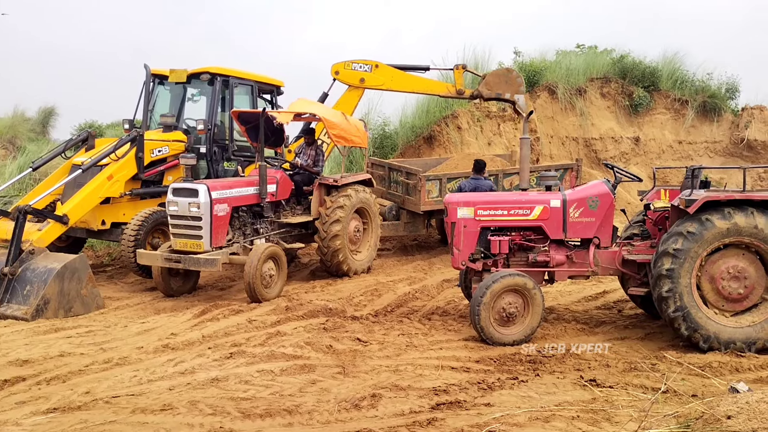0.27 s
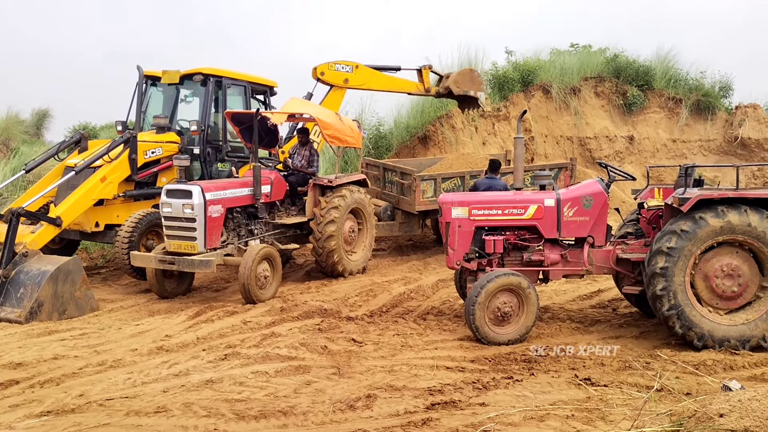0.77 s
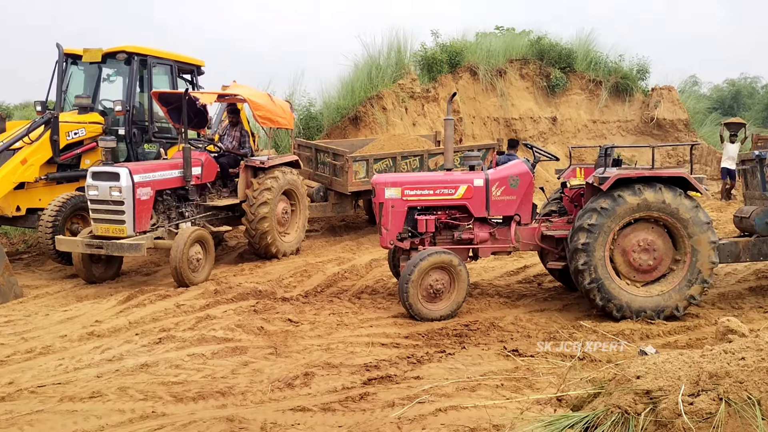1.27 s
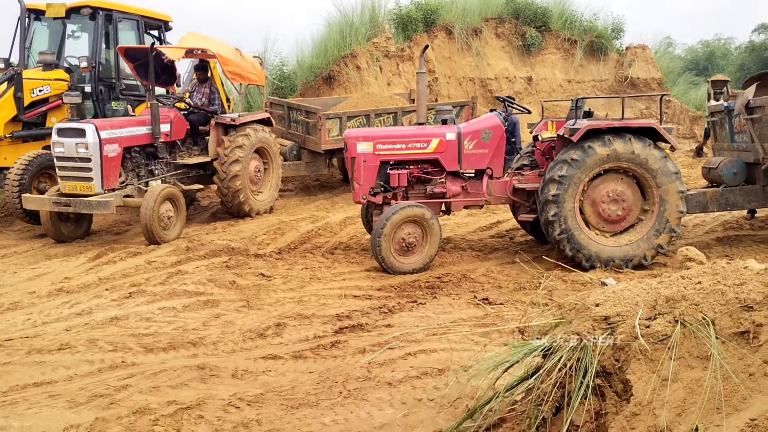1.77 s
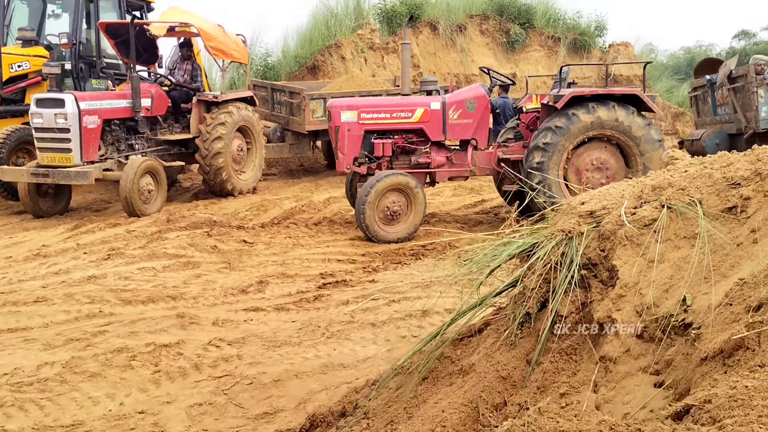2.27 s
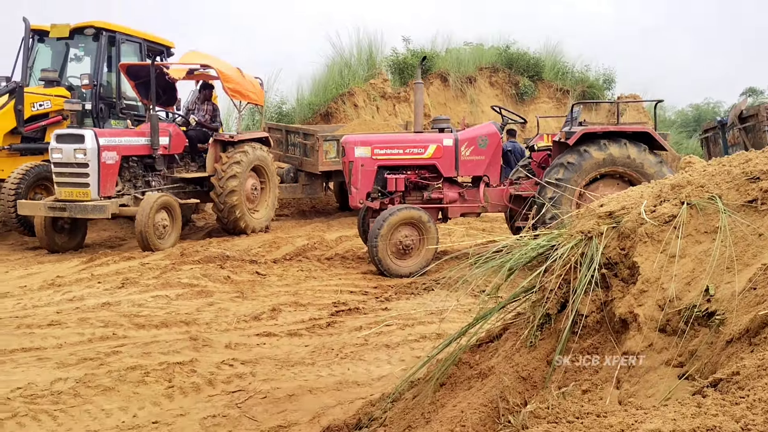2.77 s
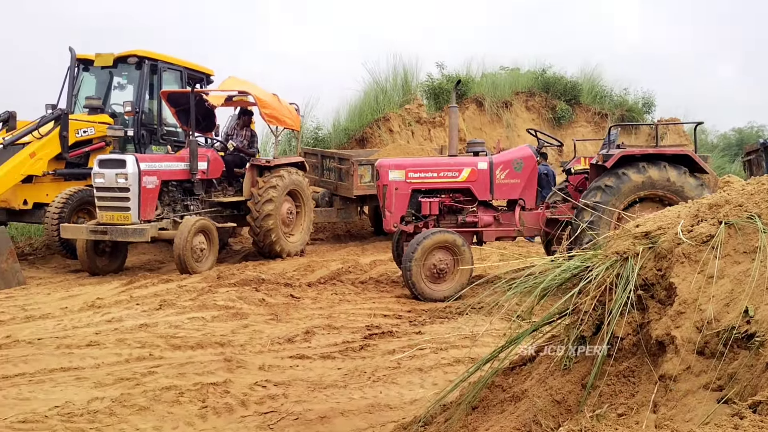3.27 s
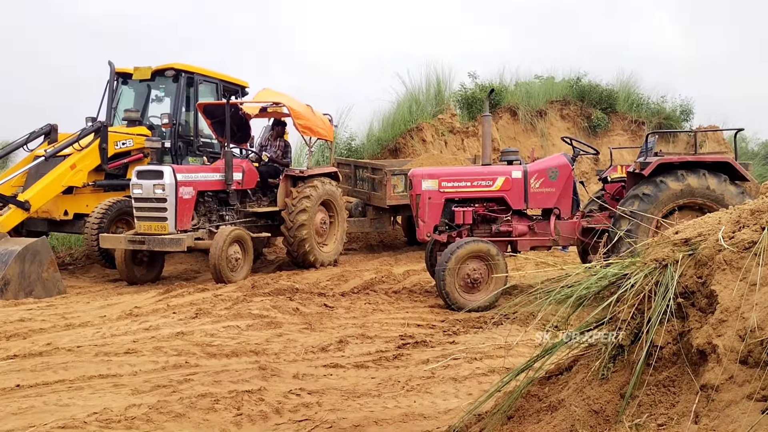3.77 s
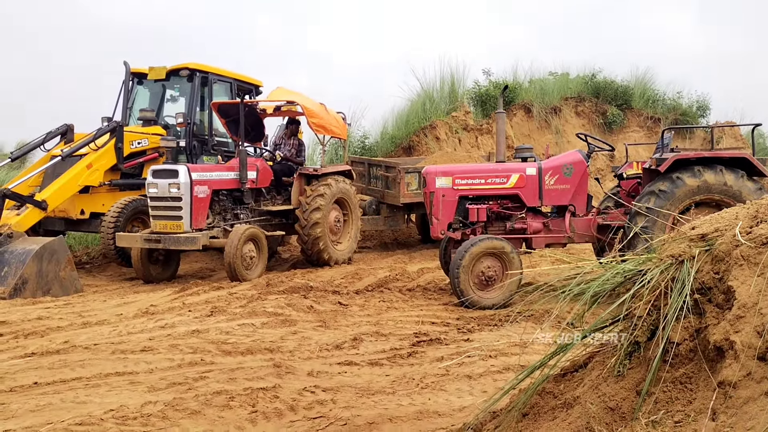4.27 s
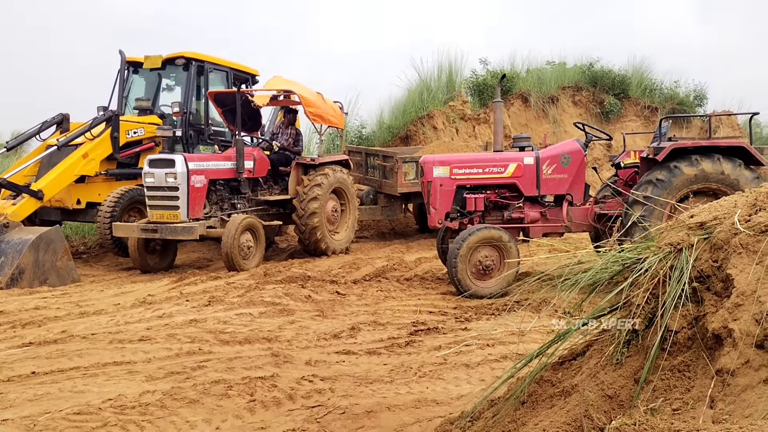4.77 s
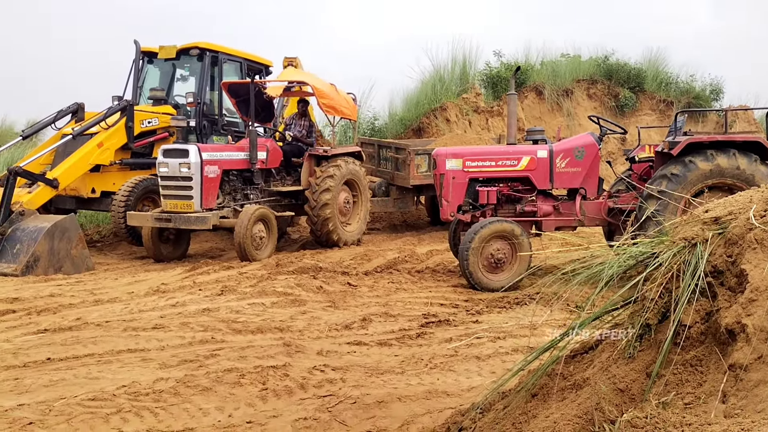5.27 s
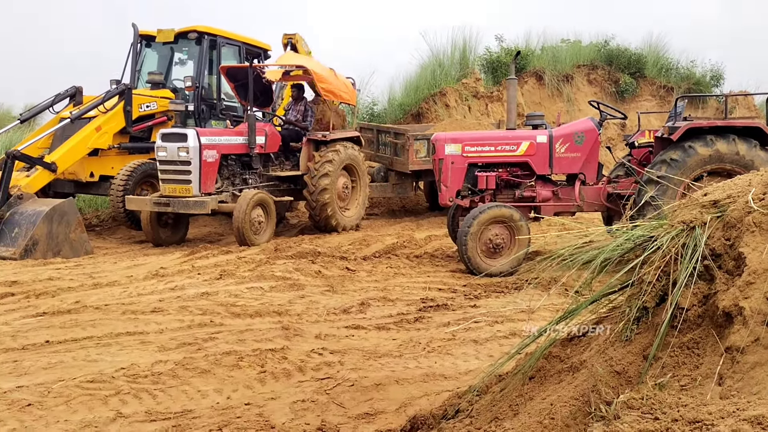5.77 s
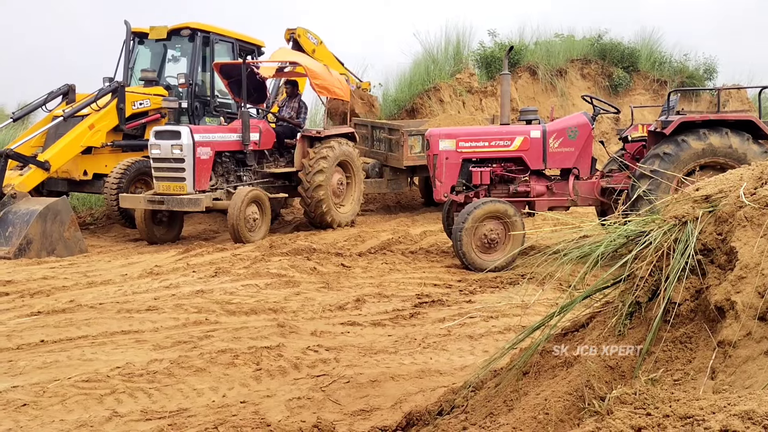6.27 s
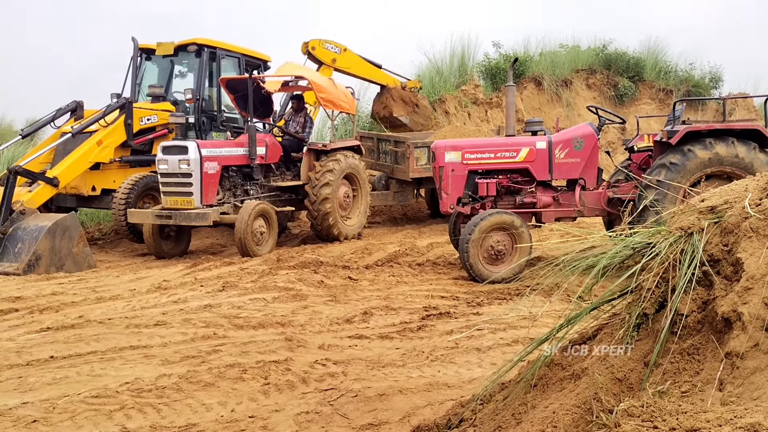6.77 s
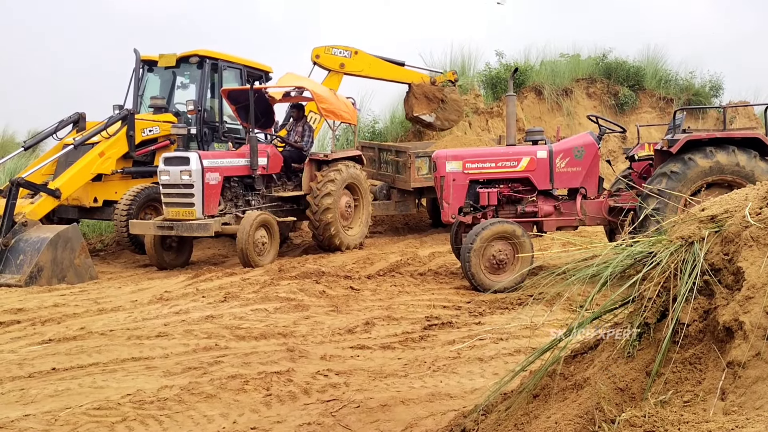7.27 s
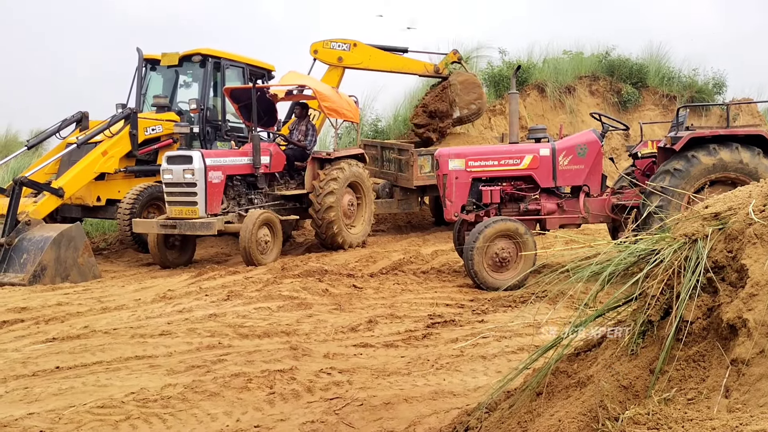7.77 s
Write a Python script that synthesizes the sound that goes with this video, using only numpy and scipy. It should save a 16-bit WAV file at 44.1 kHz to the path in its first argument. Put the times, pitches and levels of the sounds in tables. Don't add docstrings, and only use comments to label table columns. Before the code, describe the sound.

Outdoors at a soil pit, a backhoe loader's diesel drones steadily with clattering block, ticking valves and hydraulic roar at first. A tractor knocks fast beside it with tinny rattle. Steel bucket hits come early, then bass swells and highs dull as the microphone moves behind a mound. Past the middle the tractor slows to a faint idle, while loose panels keep clanking. Stereo handheld microphone, wind puffs.

```python
import sys
import numpy as np
from scipy import signal
from scipy.fft import rfft, irfft, next_fast_len
from scipy.io import wavfile
from scipy.ndimage import uniform_filter1d

SR = 44100
rng = np.random.default_rng(int(sys.argv[2]) if len(sys.argv) > 2 else 0)


def materialize(psi):
    bounded = np.clip(np.atleast_2d(psi).T, -1, 1)
    quanta = np.round(bounded * 32767).astype(np.int16)
    wavfile.write(sys.argv[1], SR, quanta)


def invert_db(x):
    u = np.asarray(x, float) / 20
    return 10 ** u


N = 353946

# start_s, level_db
MOUND_SWELL = [(0, -46), (.2, -50), (.53, -41), (.75, -49), (.95, -45.5), (1.3, -51.5), (1.75, -46.5),
               (2.1, -39.5), (2.35, -38), (2.7, -34), (3.3, -32.5), (4.35, -32), (4.65, -30), (5.35, -30.5),
               (5.8, -32), (6.4, -30.5), (7.3, -31.5), (8.03, -37)]
# start_s, knock_db, tin_looseness_db
TRACTOR_LEVELS = [(0, -45.5, -9.5), (.96, -43.5, -11.5), (1.3, -42, -10), (1.74, -42, -9),
                  (2.3, -41.5, -15), (2.5, -43.5, -14), (3.37, -41.5, -9.5), (4.45, -44.5, -10.5),
                  (4.65, -48.5, -12), (4.87, -66, 0), (5.8, -63, 1), (6.6, -67, 4), (6.75, -60, -0.5),
                  (7.0, -58, -3), (7.12, -61, -1), (7.28, -51.5, -12), (7.55, -60, 0), (8.03, -56, -4.5)]


def rms_one(x):
    return x / np.sqrt(np.mean(x ** 2) + 1e-20)


def in_time(rows):
    s, *columns = np.transpose(rows)
    return [np.interp(np.arange(N) / SR, s, column) for column in columns]


def at_hz(points, hz):
    hz_points, values = np.transpose(points)
    return np.interp(np.log(np.maximum(hz, 1)), np.log(hz_points), values)


def coarse_drift(rate):
    r = np.exp(-80 * np.pi * rate / SR)
    noise = rng.standard_normal(N // 40 + 2002)
    return rms_one(signal.lfilter([1], [1, -2 * r, r * r], noise)[2000:])


def fine(coarse, size=N):
    return np.interp(np.arange(size) / 40, np.arange(len(coarse)), coarse)


def drift(rate):
    return fine(coarse_drift(rate))


def colour(x, points):
    size = next_fast_len(N)
    gain = invert_db(at_hz(points, np.fft.rfftfreq(size, 1 / SR)))
    return irfft(rfft(x, size) * gain, size)[:, :N]


def body(x, peaks, patchy_db=0):
    out = 0
    for k, (hz, width, db) in enumerate(peaks):
        r = np.exp(-np.pi * 1.5 * width / SR)
        b = (1 - r * r) / 2 * np.array([1, 0, -1])
        a = [1, -2 * r * np.cos(2 * np.pi * hz / SR), r * r]
        swell = invert_db(db)
        if patchy_db:
            wander = 1.8 * coarse_drift(15.7) + 1.1 * coarse_drift(2.56)
            swell = fine(invert_db(db + patchy_db * wander), x.shape[1])
        out = out + (-1) ** k * swell * signal.sosfilt([[*b, *a]] * 2, x)
    return rms_one(out)


def body_during(start_s, end_s, x, peaks, patchy_db):
    out = np.zeros_like(x)
    span = slice(round(start_s * SR), round(end_s * SR))
    out[:, span] = body(x[:, span], peaks, patchy_db)
    return out


def firings(count, cylinders_db, spread_db, decay_s, between_db, alike=0, uneven=(), contact=0):
    which = np.floor(count).astype(int)
    total = which[-1] + 2
    size = invert_db(np.resize(cylinders_db, total) + spread_db * rng.standard_normal(600)[:total])
    for s, db in uneven:
        size[round(count[round(s * SR)])] *= invert_db(db)
    fired = np.diff(which, prepend=which[0]) > 0
    burst = signal.lfilter([1], [1, -np.exp(-1 / (decay_s * SR))], fired * size[which])
    noise = rng.standard_normal((2, N))
    since = np.arange(N) - np.maximum.accumulate(fired * np.arange(N))
    grain = np.sqrt(alike) * noise[:, since] + np.sqrt(1 - alike) * noise
    first_blow = contact * fired * burst * [[1], [.5]]
    return burst * grain + invert_db(between_db) * noise[:, ::-1] + first_blow


def exhaust(count, orders, wobble_db):
    out = 0
    for multiple, db, sign in orders:
        level = invert_db(db + wobble_db * (1 - db / 8) * drift(5))
        out = out + sign * level * np.sqrt(2) * np.cos(2 * np.pi * multiple * count)
    return out


def loader():
    # start_s, speed_rpm
    speed = [(0.0, 1460.3), (0.34, 1356.6), (0.6, 1497.8), (0.9, 1419.6), (1.2, 1528.3), (1.45, 1469.0),
             (2.5, 1440.1), (3.8, 1421.8), (4.1, 1430.8), (4.36, 1383.3), (4.68, 1434.4), (5.1, 1412.6),
             (5.68, 1445.7), (6.0, 1392.4), (6.7, 1449.6), (7.1, 1416.8), (7.72, 1484.2), (8.03, 1436.6)]
    # start_s, effort_db over the mean, bonnet_turned_db towards the ports
    digging = [(0, 9, -46), (.3, 3.5, -1), (.5, 7.5, -1), (.83, 3.5, -5.5), (1.09, 6.5, 1.5),
               (1.5, -0.5, -6), (2.4, 0.5, -6), (3.1, 1.5, -4.5), (4.1, 2.5, -3.5), (4.47, -1, 7),
               (4.8, -6.5, 4), (5.0, -2, 2.5), (5.4, -8, 8.5), (6.04, -5, 5), (6.5, -4.5, 5.5),
               (7.0, -2.5, 4), (7.4, -2.5, 3.5), (8.03, -2.5, 2.5)]
    # multiple of the four-stroke cycle, level_db, polarity
    pipe_orders = [(4, -31, 1), (6, -34, -1), (7, -27, -1), (8, 0, 1), (10, -15, 1), (11, -28, 1),
                   (12, -13, 1), (13, -30, -1), (14, -29, -1), (16, -24, -1), (18, -31, 1), (23, -35, 1)]
    # pitch_hz, width_hz, level_db
    pipe_puff = [(78.6, 128, -3.5), (108.6, 49, -2), (123.3, 29, 2), (151, 141, -6)]
    # pitch_hz, width_hz, level_db
    block_peaks = [(778, 69, -12), (800, 52, -7.5)]
    bonnet_peaks = [(585.5, 69, 3), (966, 110, 3.5), (1136, 33, 2.5), (1297, 63, 6), (1600, 107, 5),
                    (1793, 32, -1)]
    valve_peaks = [(3854, 270, 2.5), (4514, 640, -6), (5164, 730, 0.5), (5910, 82, 5), (7770, 260, -9.5),
                   (6400, 210, 9.5)]
    cylinder_levels = [0, -2, -4, -7]
    # start_s, level_db
    pump_levels = [(0, -45.5), (.3, -42.5), (.6, -42.5), (.9, -46.5), (1.15, -43.5), (1.3, -52),
                   (1.9, -54.5), (2.3, -70), (8.03, -113)]
    # pitch_hz, width_hz, level_db
    pump_peaks = [(394, 60, -9), (736, 100, -12.5), (928, 118, -4), (1120, 51, -11)]

    rpm, = in_time(speed)
    drone_db, = in_time(MOUND_SWELL)
    effort_db, turned_db = in_time(digging)
    cycles = .12 + np.cumsum(rpm) / 120 / SR
    tones = exhaust(cycles, pipe_orders, wobble_db=.6) * [[1], [0]]
    puff = invert_db(-19) * body(rng.standard_normal((2, N)), pipe_puff)
    drone = invert_db(drone_db + .2) * (tones + puff)
    strokes = firings(4 * cycles + .5, cylinder_levels, 1.8, .012, -9)
    block = invert_db(-55 + effort_db) * body(strokes, block_peaks, patchy_db=1.4)
    bonnet = invert_db(-51.5 + .98 * effort_db + turned_db) * body(strokes, bonnet_peaks, patchy_db=.35)
    taps = firings(4 * cycles + .6, [0], 1.5, .008, -9)
    ticks = invert_db(-58 + .71 * effort_db) * body(taps, valve_peaks, patchy_db=1.2)
    surges = firings(4 * cycles, [0], 3.0, .014, -11)
    pump = invert_db(in_time(pump_levels)[0]) * body_during(0, 2.6, surges, pump_peaks, 1.0)
    return drone + block + bonnet + ticks + pump


def tractor():
    # start_s, speed_rpm
    speed = [(0.0, 1033.4), (1.0, 1053.5), (2.0, 1046.1), (3.0, 1059.3), (3.5, 1060.6), (4.0, 1076.3),
             (4.4, 1023.1), (4.8, 945.7), (5.2, 697.9), (5.6, 631.9), (6.0, 733.8), (6.5, 730.0),
             (7.0, 715.5), (7.5, 668.2), (8.03, 721.4)]
    # multiple of the firing rate, level_db, polarity
    pipe_orders = [(2, -20, 1), (3, -8, 1), (4, 0, 1), (5, -11, -1), (6, -19, -1)]
    # pitch_hz, width_hz, level_db
    revved_peaks = [(2150, 314, 0.5), (2394, 70, 7), (2592, 252, 0), (2901, 110, -5), (4930, 510, -16.5)]
    idle_peaks = [(2210, 120, -23), (2600, 54, 4.5), (2843, 76, -5), (2920, 120, -12), (4750, 690, -24)]
    tin_peaks = [(7300, 2670, 9.5), (10030, 900, 1.5), (8250, 400, 2), (11130, 1140, 5)]
    cylinder_levels = [-3, -3.5, -4]
    # start_s, level_db
    revved_uneven = [(0.061, -2.6), (0.1, 4.9), (0.293, -2.1), (0.331, -2.3), (0.369, 2.1), (0.6, -8.4),
                     (0.638, 2.2), (0.676, 3.6), (0.714, 3.0), (0.905, -3.3), (0.943, 5.7), (0.981, -2.5),
                     (1.019, -4.2), (1.171, 5.6), (1.285, 4.8), (1.399, -4.0), (1.513, -2.2), (1.551, 2.9),
                     (1.666, 2.5), (1.704, -2.9), (1.895, 4.5), (1.971, -4.6), (2.009, 4.2), (2.429, -3.4),
                     (2.581, 3.5), (2.657, -4.7), (2.77, -4.3), (2.808, 3.0), (2.997, 3.8), (3.111, 4.8),
                     (3.224, -4.3), (3.563, 2.5), (3.639, -2.2), (3.676, 3.9), (3.714, -2.9), (3.788, 2.7),
                     (3.863, -2.1), (3.975, -2.2), (4.012, 4.9), (4.354, 5.1), (4.393, 4.2), (4.512, -7.5),
                     (4.552, -3.7), (4.633, 3.3), (4.674, -6.4)]
    idle_uneven = [(5.364, 12), (5.485, 12), (5.849, 14), (5.903, 16), (6.405, 11), (6.67, 10), (6.724, 12),
                   (6.781, 8.5), (6.892, 11), (6.947, 12.5), (7.116, 5), (7.249, 7), (7.289, 1.5),
                   (7.409, -10), (7.53, 3.5), (7.59, -5), (7.646, -5), (7.699, 9.5), (7.816, 10.5),
                   (7.875, 9), (7.993, 6.5)]

    rpm, = in_time(speed)
    knock_db, loose_db = in_time(TRACTOR_LEVELS)
    count = .13 + np.cumsum(rpm) / 40 / SR
    pipe_db = -43 + (in_time(MOUND_SWELL)[0] + 32) + .09 * (rpm - 1050)
    pipe = invert_db(pipe_db) * exhaust(count, pipe_orders, wobble_db=1.0) * [[1], [0]]
    bang = count + .29
    blows = firings(bang, cylinder_levels, .4, .008, -19, alike=.75,
                    uneven=[*revved_uneven, *idle_uneven], contact=3.5)
    idling = np.clip((850 - rpm) / 150, 0, 1)
    revved_knock = body_during(0, 5.2, blows, revved_peaks, .25)
    idle_knock = body_during(4.8, 9, blows, idle_peaks, 2.0)
    knock = (1 - idling) * revved_knock + idling * idle_knock
    shakes = firings(bang, cylinder_levels, 1.5, .010, -5)
    rattle = invert_db(loose_db) * body(shakes, tin_peaks, patchy_db=1.2)
    return pipe + invert_db(knock_db - 2.5) * (knock + rattle) + chirps(count)


def yard():
    # middle_s, level_db, half_length_s, hollow_pitch_hz
    wind_puffs = [(0.032, -48, 0.023, 337.3), (0.549, -48.5, 0.13, 330), (0.984, -47.5, 0.074, 340),
                  (1.223, -48, 0.057, 290.5), (1.55, -43.5, 0.045, 303.2), (1.913, -44, 0.073, 288),
                  (2.38, -43, 0.13, 309), (2.853, -47.5, 0.14, 315.2), (3.475, -56.5, 0.15, 291),
                  (3.923, -51, 0.13, 283.6), (4.387, -46.5, 0.078, 323), (4.598, -53.5, 0.08, 330),
                  (5.148, -41, 0.046, 333.7), (5.508, -51.5, 0.1, 285), (6.06, -53, 0.08, 284.7),
                  (6.337, -52, .06, 383), (6.622, -59, 0.12, 273.5), (7.467, -45, 0.12, 337.6),
                  (7.88, -47.5, 0.067, 303.5)]
    # pitch_hz, level_db per Hz
    rumble_spectrum = [(94, -66), (160, -4.5), (226, -2), (340, -2.5), (408, -4.5), (471, -17.5),
                       (520, -13), (680, -81), (1140, -120)]
    calm_db, calm_hz = -56, 276.4

    t = np.arange(0, N + 80, 40) / SR
    level, pull = invert_db(calm_db), 0
    for s, db, half, hz in wind_puffs:
        puff = invert_db(db) * np.exp(-((t - s) / half) ** 2)
        level = level + puff
        pull = pull + puff * (hz - calm_hz)
    hollow_hz = calm_hz + pull / level
    rumble = rms_one(colour(rng.standard_normal((2, N)), rumble_spectrum))
    low_pass = signal.butter(2, 40.0, fs=SR, output="sos")
    flutter = signal.sosfilt(low_pass, rng.standard_normal((2, N)))
    hollow = rms_one(flutter * np.sin(2 * np.pi * np.cumsum(fine(hollow_hz)) / SR))
    return invert_db(-8.0) * fine(level) * (1.82 * rumble + hollow)


def far_engines():
    # pitch_hz, level_db per Hz
    wash_spectrum = [(20, -37), (150, -33), (1700, -32), (2620, -31.5), (3340, -39), (10600, -57.5),
                     (12800, -51.5), (15400, -75)]

    out, hz = 0, np.geomspace(30, 15500, 90)
    for _ in range(3):
        ragged_db = at_hz(wash_spectrum, hz) + 5.0 * rng.standard_normal(len(hz))
        clump = colour(rng.standard_normal((2, N)), np.transpose([hz, ragged_db]))
        out = out + invert_db(2.0 * drift(2)) * clump
    knock_db, swell_db = in_time(TRACTOR_LEVELS)[0], in_time(MOUND_SWELL)[0]
    return invert_db(-49.5 + .29 * (knock_db + 46) - .47 * (swell_db + 40)) * rms_one(out)


def swells():
    # middle_s, level_db, half_length_s, pitch_hz
    panel_hums = [(0.505, -49, 0.29, 1003), (2.2, -52, .08, 1174), (2.621, -53, 0.25, 962),
                  (2.749, -52, .25, 803), (3.145, -55, .25, 987), (3.401, -55.5, 0.26, 800),
                  (3.446, -55, 0.084, 960), (4.0, -56, 0.18, 800), (4.446, -48, 0.07, 1067),
                  (4.462, -52, 0.049, 576), (4.674, -45.5, 0.12, 1110), (5.095, -55, 0.17, 1290),
                  (5.14, -52, .06, 573), (5.39, -51, 0.085, 1284), (5.777, -51, 0.053, 608),
                  (6.15, -50.5, 0.15, 1290), (6.448, -54.5, 0.15, 1032), (6.503, -57, 0.074, 1625),
                  (6.75, -56, .07, 1300), (6.757, -54, 0.086, 1590), (6.806, -55.5, 0.14, 590),
                  (7.148, -51, 0.13, 1676), (7.3, -51.5, 0.13, 1117), (7.55, -52, 0.037, 1580),
                  (7.74, -45.5, 0.072, 1603), (7.75, -52, 0.061, 900)]

    out, t = np.zeros((2, N)), np.arange(-SR // 2, SR // 2) / SR
    for s, db, half, hz in panel_hums:
        i = max(round(s * SR) - SR // 2, 0)
        hum = body(rng.standard_normal((2, SR)), [(hz, .055 * hz, 0)])
        hum = invert_db(db) * np.exp(-(t / half) ** 2) * hum
        out[:, i:i + SR] += hum[:, :N - i]
    return out


def chirps(count):
    # start_s, length_s, level_db
    spells = [(0.717, 0.034, -54), (1.57, 0.043, -58), (3.407, 0.54, -56.5), (4.15, 0.28, -79),
              (4.913, 0.34, -61.5), (5.388, 0.29, -58.5), (6.037, 0.071, -63), (6.238, .03, -63),
              (6.393, 0.57, -57), (7.072, 0.079, -57), (7.227, 0.11, -59), (7.504, 0.058, -64),
              (7.646, 0.35, -57)]
    pitch_hz, length_s, edge_s = 10790, .021, .018

    from_firing_s = ((count + .5) % 1 - .5) / (np.gradient(count) * SR)
    size = invert_db(2.5 * rng.standard_normal(600))[np.floor(count + .5).astype(int)]
    bump = size * np.exp(-2 * (2 * from_firing_s / length_s) ** 2)
    tone = np.sin(2 * np.pi * np.cumsum(pitch_hz + 25 * drift(35.4)) / SR)
    t, loose = np.arange(N) / SR, 0
    for s, length, db in spells:
        inside_s = np.minimum(t - s, s + length - t)
        loose = loose + invert_db(db) * np.clip(inside_s / edge_s + 1, 0, 1)
    return invert_db(-5.0) * loose * rms_one(bump * tone) * [[1], [.6]]


def clanks():
    # start_s, peak_db, ring_hz
    panel_clanks = [(.97, -30, 961), (1.108, -26, 985), (1.468, -30, 676), (1.531, -33.5, 775),
                    (1.721, -35, 720), (1.79, -51, 800), (1.903, -35, 706), (2.114, -41.5, 778),
                    (2.308, -42, 1006), (2.443, -38, 777), (2.526, -30, 940), (2.608, -33, 982),
                    (2.694, -31.5, 807), (2.777, -27.5, 789), (2.86, -37, 808), (2.945, -43, 810),
                    (3.024, -49, 767), (3.112, -30.5, 810), (3.194, -51, 800), (3.282, -41, 798),
                    (3.426, -40, 970), (3.697, -42, 840), (3.871, -31, 778), (4.289, -37, 796),
                    (4.374, -35.5, 783), (4.545, -42, 1170), (4.49, -31, 834), (4.795, -34.5, 820),
                    (5.072, -43, 1273), (5.136, -39, 1273), (5.305, -33.5, 1260), (5.639, -45, 810),
                    (5.807, -36, 803), (5.892, -40, 820), (5.978, -51, 974), (6.087, -56, 1240),
                    (6.195, -37.5, 1048), (6.319, -44, 1040), (6.403, -39, 805), (6.573, -42, 1153),
                    (6.903, -37, 800), (7.076, -35.5, 820), (7.157, -41, 955), (7.26, -31, 938),
                    (7.492, -36.5, 979), (7.632, -47, 966), (7.84, -39, 800), (7.9, -46, 999)]
    # start_s, peak_db, ring_hz
    hollow_clanks = [(3.549, -56, 537), (3.689, -32, 608), (3.742, -42, 593), (3.803, -46, 598),
                     (3.884, -43, 590), (3.953, -31, 584)]
    t60_s, attack_s = .092, .00063

    out, t = np.zeros((2, N + SR)), np.arange(round(.15 * SR)) / SR
    for s, db, hz in [*panel_clanks, *hollow_clanks]:
        ring = body(rng.standard_normal((2, len(t))), [(hz, .031 * hz, 0)])
        i = round(s * SR)
        out[:, i:i + len(t)] += invert_db(db + 1.5 - 60 * t / t60_s) * ring * (1 - np.exp(-t / attack_s))
    return out[:, :N]


def knocks():
    # start_s, peak_db, ring_hz, t60_s, crack_top_hz
    steel_hits = [
        (1.031, -27, 960, 0.14, 4050),
        (1.196, -34, 1380, 0.19, 4130),
        (2.288, -37, 2650, 0.22, 10600),
        (4.801, -65.5, 838, 0.036, 1470),
        (5.114, -39.5, 925, 0.11, 3520),
        (5.305, -39, 1200, 0.13, 3000),
        (5.807, -69, 823, 0.15, 1494),
        (5.891, -46, 830, 0.064, 1532),
        (6.083, -36.5, 905, 0.12, 2804),
        (6.196, -62, 1094, 0.25, 2500),
    ]

    out, t = np.zeros((2, N)), np.arange(round(.3 * SR)) / SR
    for s, db, hz, t60, top_hz in steel_hits:
        first_contact = 9 * (np.arange(len(t)) == 40)
        noise = rng.standard_normal((2, len(t))) + first_contact
        ring = body(noise, [(hz, .15 * hz, 0), (1.5 * hz, .2 * hz, -1), (3.3 * hz, .4 * hz, -13)])
        band = signal.butter(4, [400, top_hz], "band", fs=SR, output="sos")
        crack = rms_one(signal.sosfilt(band, noise))
        envelope = invert_db(db - 2 - 60 * t / t60) * (1 - np.exp(-t / .001))
        i = round(s * SR)
        out[:, i:i + len(t)] += envelope * (ring + .5 * crack)
    return out


def dip(hz, centre_hz, db, width_oct):
    off, shoulder = np.log2(hz / centre_hz) / width_oct, .099
    return db * (np.exp(-off ** 2) * (1 + shoulder) - shoulder * np.exp(-(off / 3) ** 2))


def walk(x):
    # arrival_s, added_hz, low_cancelled_hz, high_cancelled_hz, depth_db
    standpoints = [
        (0, 1053, 1300, 5420, -6.5),
        (1.3, 634, 1130, 6480, -8),
        (2.3, 889, 1680, 3340, -5),
        (3.1, 920, 1900, 3990, -3.5),
        (4.4, 1338, 2050, 4014, -2),
        (6.4, 1600, 2140, 4640, 1.5),
    ]
    # cancelled_hz, added_hz, depth_db, top_db
    upper_echoes = [(10000, 8300, -3.5, 2), (9200, 4700, -5.5, -1), (6500, 5030, -10, 9),
                    (7300, 6800, 1, -7), (8450, 6090, -4, 4.5), (8700, 7170, -1.5, 20)]
    low_oct, high_oct, upper_oct, top_hz, fade_s = .25, .12, .1, 12900, .264

    t, out, hz = np.arange(N) / SR, 0, np.geomspace(200, 16000, 120)
    arrived = [np.clip((t - row[0]) / fade_s + 1, 0, 1) for row in standpoints] + [0]
    for k, (_, lift_hz, low_hz, high_hz, db) in enumerate(standpoints):
        cut_hz, added_hz, upper_db, top_db = upper_echoes[k]
        echoes_db = dip(hz, low_hz, db, low_oct) + dip(hz, high_hz, 1.2 * db, high_oct)
        echoes_db -= dip(hz, lift_hz, .91 * db, low_oct)
        echoes_db += dip(hz, cut_hz, upper_db, upper_oct) - dip(hz, added_hz, upper_db / 2, upper_oct)
        echoes_db += top_db / (1 + (top_hz / hz) ** 8)
        here = arrived[k] - arrived[k + 1]
        out = out + here * colour(x, np.transpose([hz, echoes_db]))
    return out


def scene():
    # pitch_hz, likeness (0 to 1)
    likeness = [(25, .4), (60, .8), (95, 1), (150, .8), (300, .95), (800, .92), (1500, .62), (2500, .66),
                (5000, .42), (12000, .4)]
    # pitch_hz, left_minus_right_db
    balance = [(60, -.5), (150, 3), (380, 0), (800, .3), (1500, 3.5), (5500, 4.5), (8000, -1),
               (15000, -1.5)]
    # start_s, extra_left_minus_right_db
    facing = [(0, -0.5), (1.4, -0.5), (2.6, 0), (8.03, -1)]

    size = next_fast_len(N + 64)
    hz = np.fft.rfftfreq(size, 1 / SR)
    echoed = walk(loader() + tractor() + yard() + far_engines())
    direct, scattered = rfft(echoed + knocks() + clanks() + swells(), size)
    alike = np.clip(at_hz(likeness, hz), 0, 1)
    tilt = invert_db(at_hz(balance, hz) / 2)
    lag = 7 + (17 - 7) / (1 + (1750 / np.maximum(hz, 1)) ** 6)
    same = np.sqrt((1 + alike) / 2) * direct
    other = np.sqrt((1 - alike) / 2) * scattered
    left = (same + other) * tilt * np.exp(-2j * np.pi * hz * lag / SR)
    right = (same - other) / tilt
    turned = invert_db(in_time(facing)[0] * [[.5], [-.5]])
    return irfft(np.array([left, right]), size)[:, :N] * turned


def starved(x):
    # pitch_hz, threshold_db
    dropped_under = [(900, -60), (1750, -14), (2600, -20), (3400, -9), (4200, -8), (5500, -7.5),
                     (10500, -8), (15500, -10)]
    # start_s, highest_whole_band_hz
    ceiling = [(0, 13800), (1.15, 13800), (1.25, 12600), (2.4, 12400), (2.6, 11500), (6.0, 11300),
               (6.6, 11800), (8.03, 12300)]

    hz, s, bins = signal.stft(x, SR, "hann", 1024)
    bands = bins[:, :512].reshape(2, 128, 4, -1)
    hz = hz[2:512:4, None]
    power = uniform_filter1d(np.mean(abs(bands) ** 2, axis=(0, 2)), size=3) + 1e-20
    under_db = 10 * np.log10(power / uniform_filter1d(power, size=13, axis=0))
    wander = signal.lfilter([.44], [1, -.9], rng.standard_normal(power.shape))
    over = hz > np.interp(s, *np.transpose(ceiling))
    threshold_db = at_hz(dropped_under, hz) + 13.5 * over + 4.5 * (1 + over) * wander
    bands = bands * (under_db > threshold_db)[:, None]
    bins[:, :512] = bands.reshape(2, 512, -1)
    return signal.istft(bins, SR, "hann", 1024)[1][:, :N]


def top_cut(x):
    return signal.sosfilt(signal.butter(12, 15600, fs=SR, output="sos"), x)


def record(dry):
    return top_cut(starved(dry))


dry = scene()
out = record(dry)
materialize(out)
```